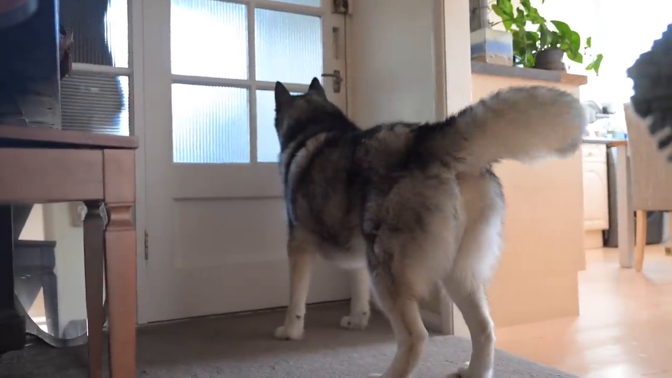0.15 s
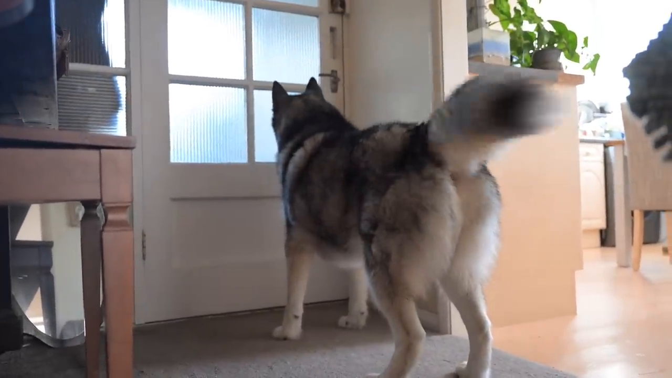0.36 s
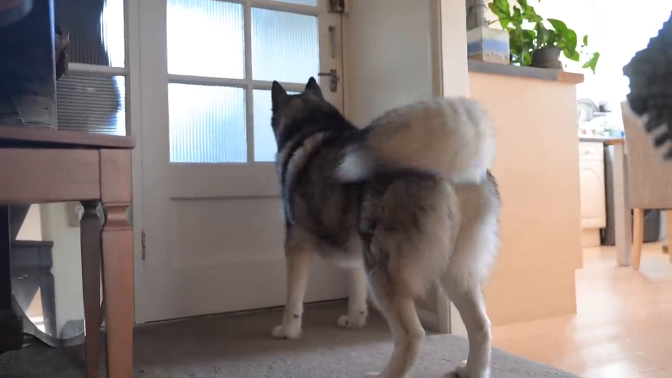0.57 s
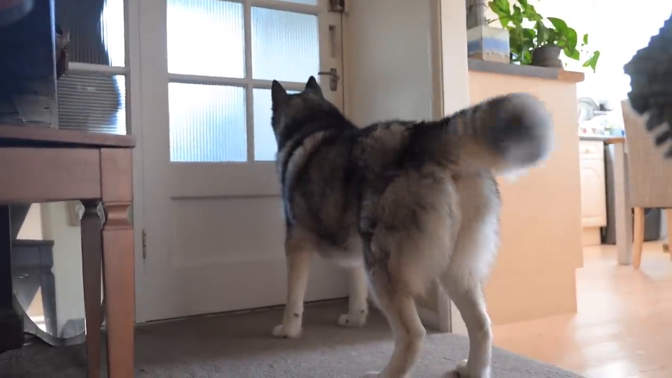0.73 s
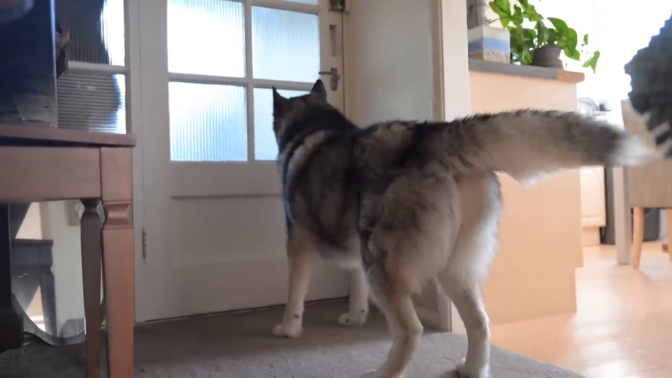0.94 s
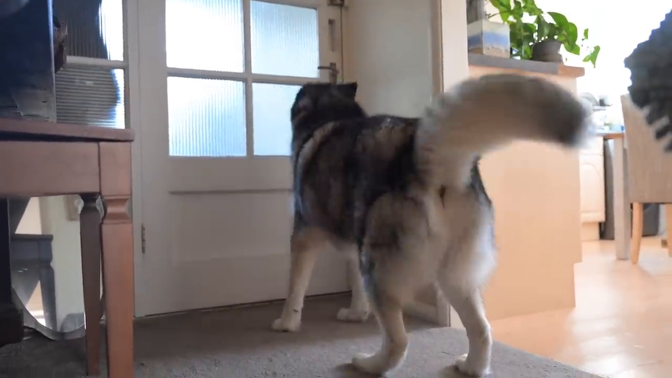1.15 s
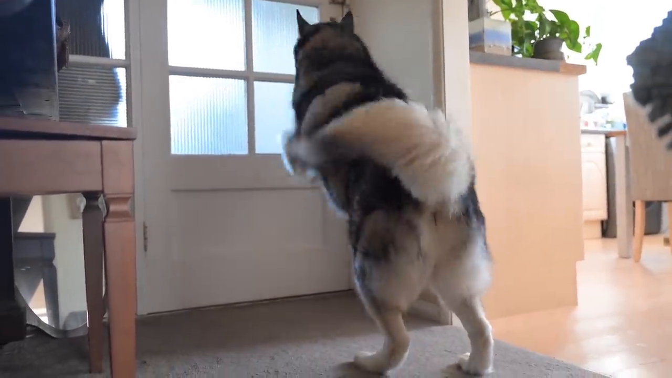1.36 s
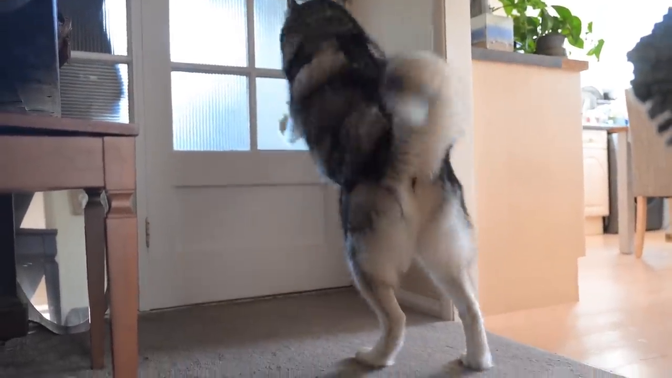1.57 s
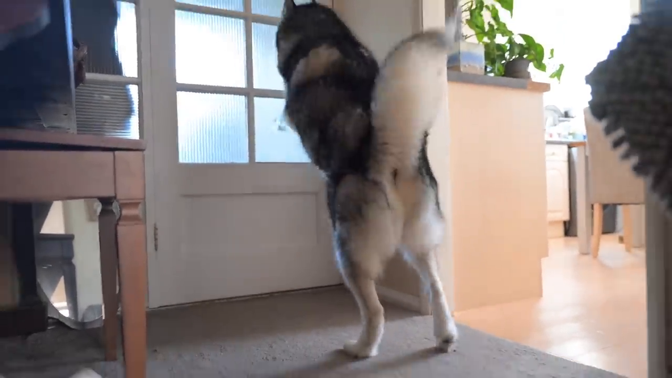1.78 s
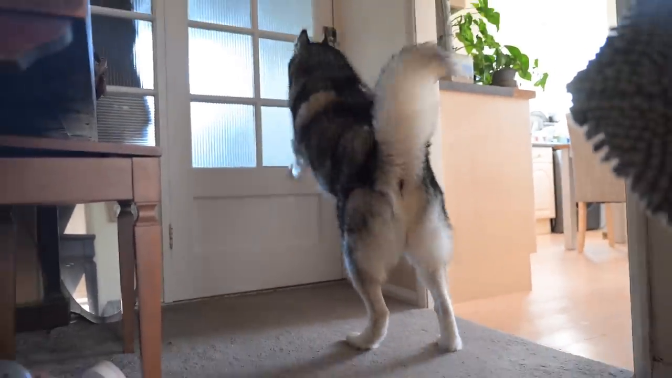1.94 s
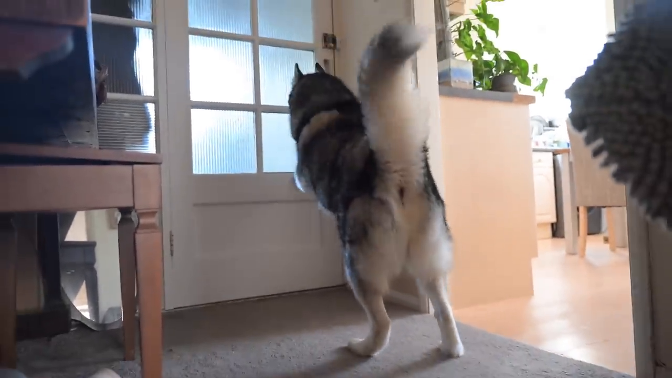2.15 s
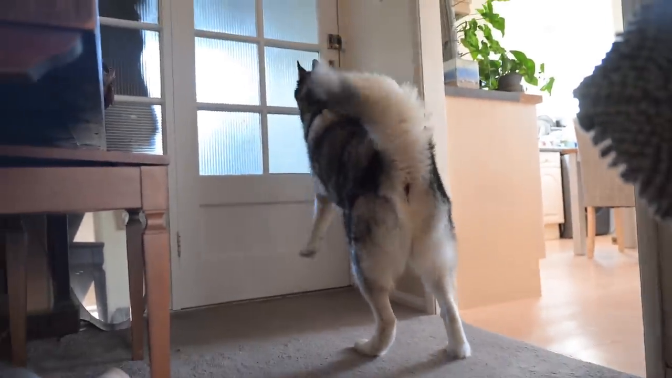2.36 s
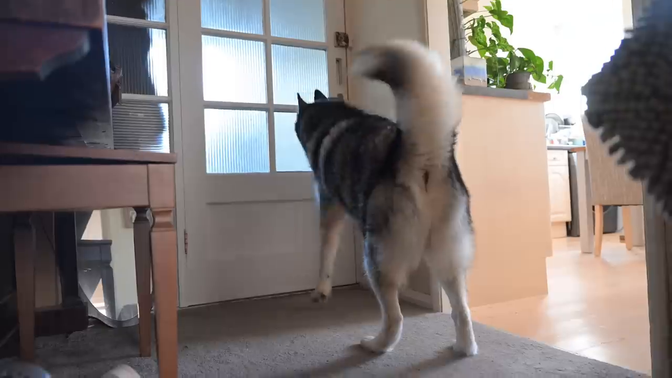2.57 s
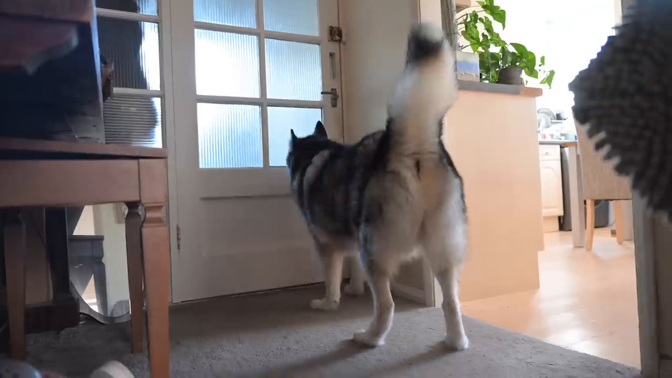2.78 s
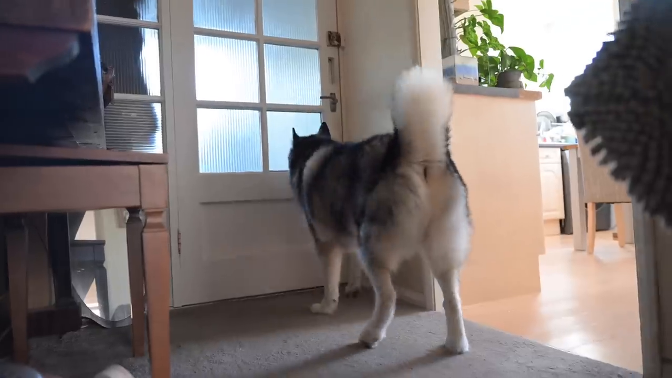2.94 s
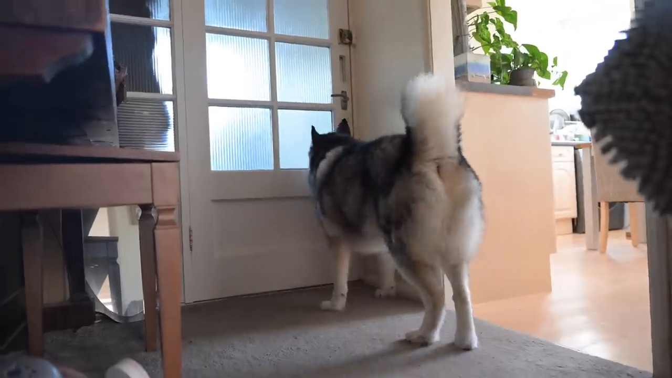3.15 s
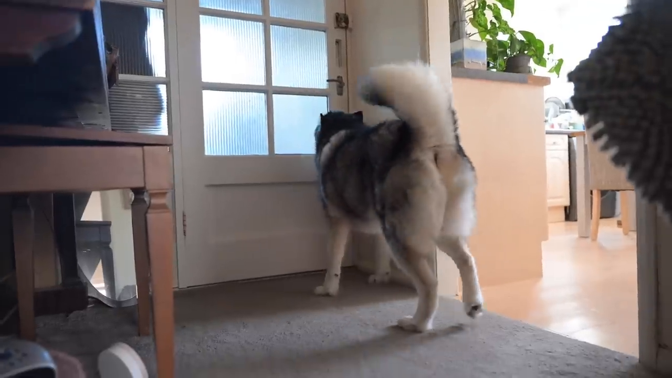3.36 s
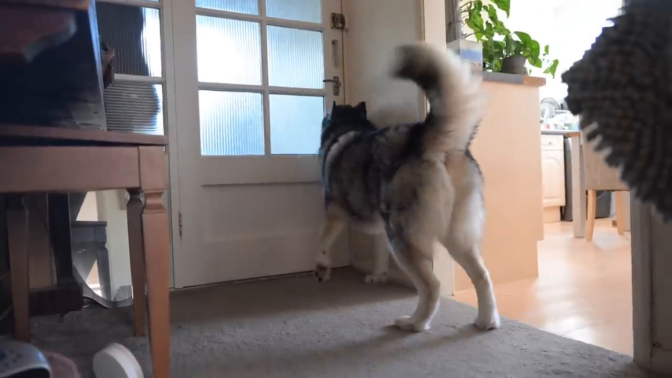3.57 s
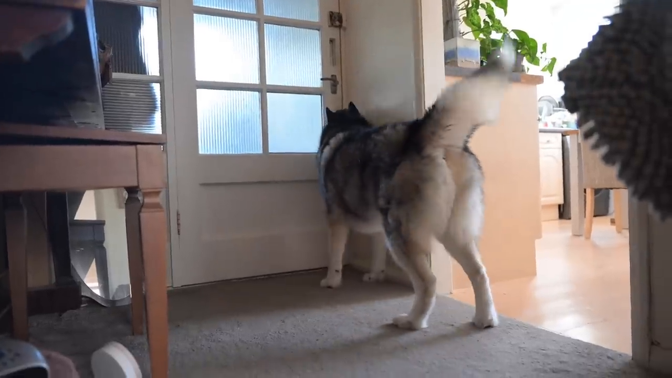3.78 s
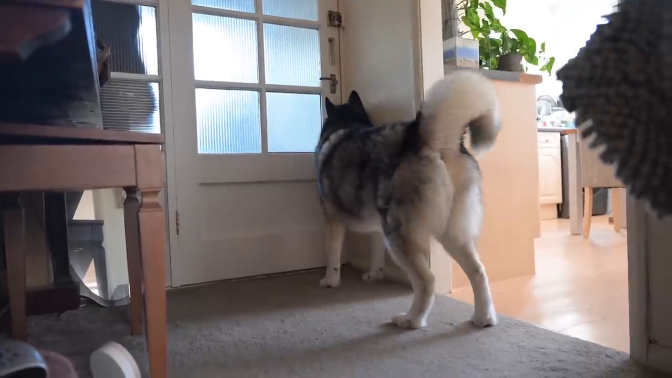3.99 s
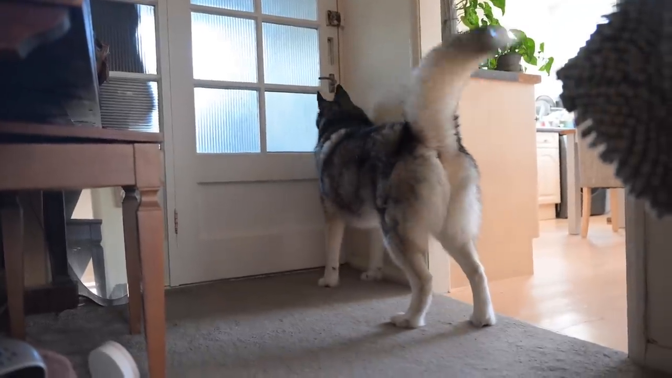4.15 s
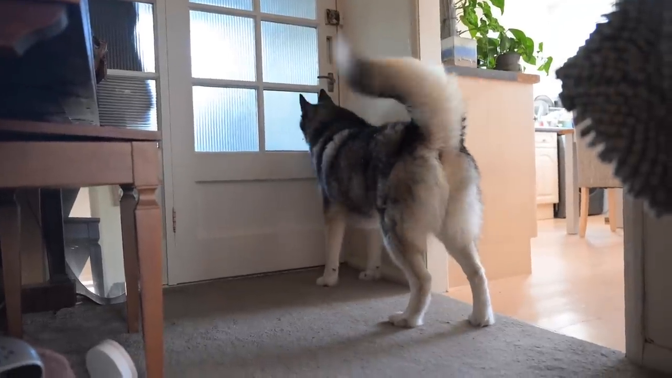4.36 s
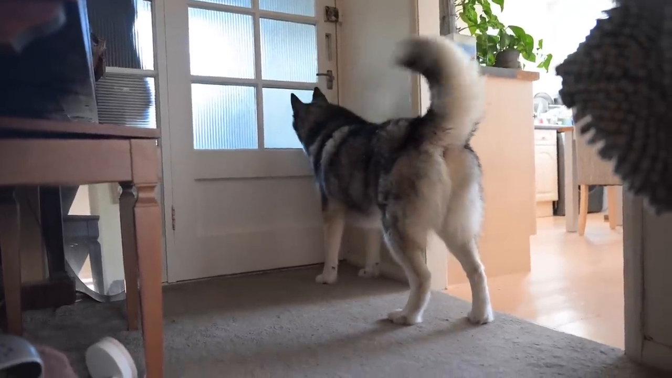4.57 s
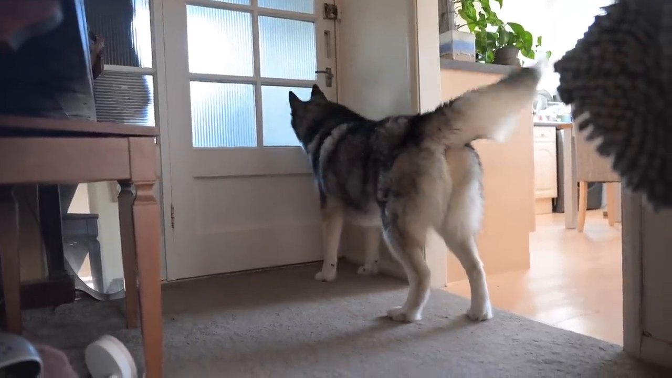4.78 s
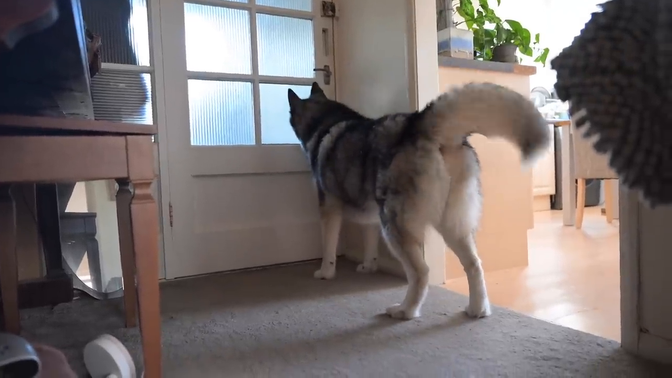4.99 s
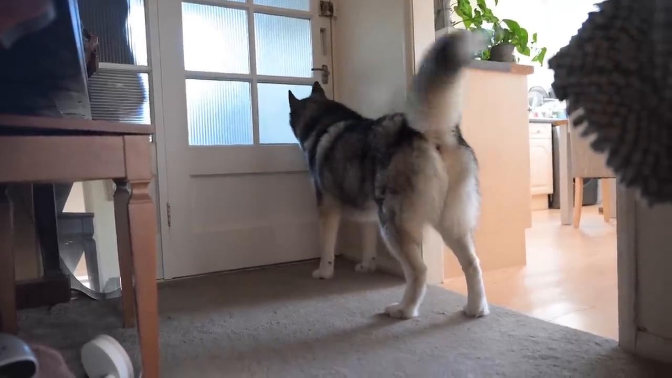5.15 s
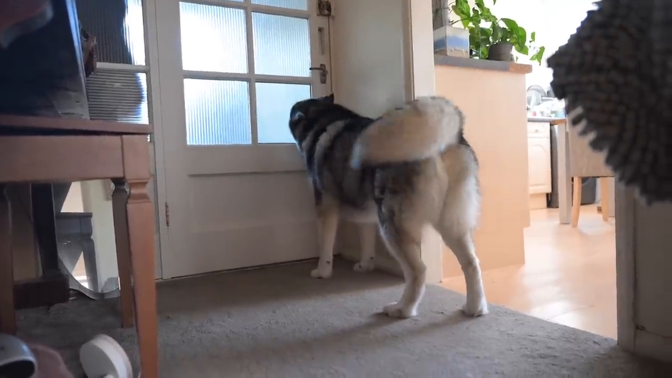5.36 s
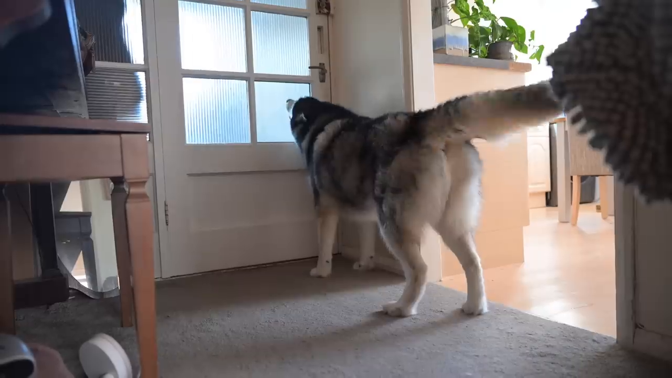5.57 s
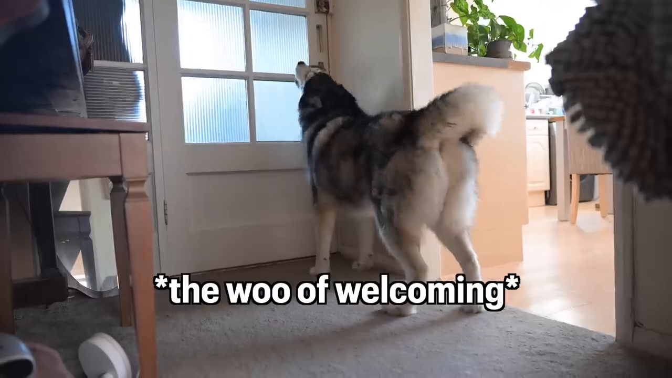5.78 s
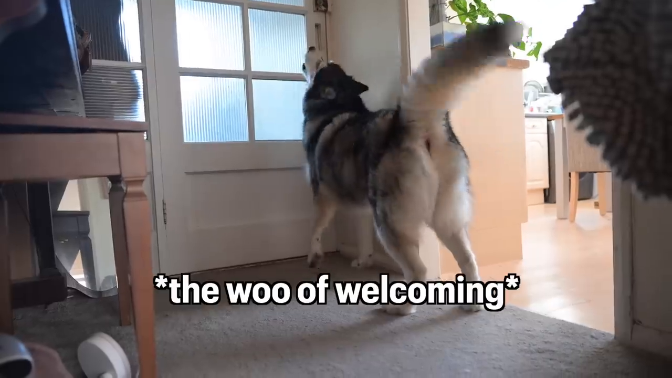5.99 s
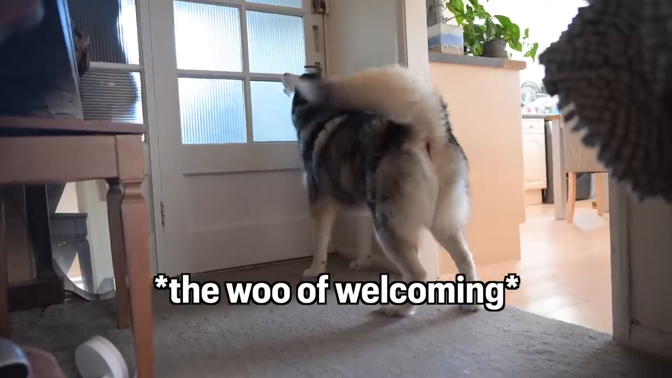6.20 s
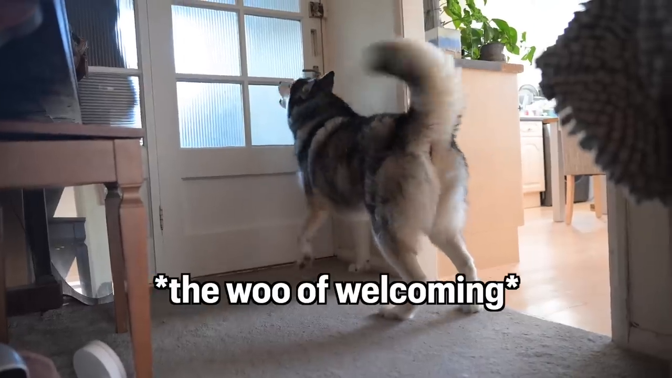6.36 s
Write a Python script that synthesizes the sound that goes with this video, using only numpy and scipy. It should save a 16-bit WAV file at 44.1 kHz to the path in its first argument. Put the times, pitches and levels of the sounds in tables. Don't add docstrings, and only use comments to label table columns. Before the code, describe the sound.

Low, quiet room hum continues for the first second. Around 1.0 s come faint breaths and a small falling nose chirp, then a sharp whine near 4.6 kHz at 1.2 s, dropping a step, and a quick huff. From 1.5 to 2.3 s the large dog scratches a wooden door: gritty claw bursts, bright nail snaps, hollow panel knocks and low rumbles, with a thin squeal over them at 1.6-1.9 s. Another scrape comes at 2.6 s and a heavy paw landing at 2.8 s. Hoarse panting is strongest at 2.75-3.0 s, returns at 3.4-3.7 and 4.1-4.3 s, then nearly stops. Sniffs come around 5.4 s. A squeak at 5.75 s leads into a loud yelp near 950 Hz at 5.83 s, sliding down in wavering steps to a fuller howl near 460 Hz by 6.1 s, sinking to 400 Hz and still sounding at the 6.4 s end.

```python
import sys
import numpy as np
from scipy import signal
from scipy.fft import rfft, irfft, next_fast_len
from scipy.io import wavfile
from scipy.ndimage import uniform_filter1d, minimum_filter1d, map_coordinates

SR = 44100
rng = np.random.default_rng(int(sys.argv[2]) if len(sys.argv) > 2 else 0)


def file_out(sig):
    cols = np.atleast_2d(sig).T
    lim = np.clip(cols, -1, 1)
    pcm = np.round(lim * 32767).astype(np.int16)
    wavfile.write(sys.argv[1], SR, pcm)


def to_linear_factor(level_db):
    exponent = np.asarray(level_db, float) / 20
    return 10 ** exponent


N = 283563


def unit(x):
    return x / np.sqrt(np.mean(x ** 2) + 1e-20)


def along(points, hz):
    f, v = np.transpose(points)
    return np.interp(np.log(hz + 1), np.log(f + 1), v)


def curves(rows):
    s, *cols = np.transpose(rows)
    return [np.interp(np.arange(N) / SR, s, c) for c in cols]


def gate(rows, fade):
    t = np.arange(N) / SR
    inside = np.minimum(t - rows[0][0], rows[-1][0] - t)
    return np.clip(inside / fade + 1, 0, 1) ** 2


def wobble(rate):
    knots = rng.standard_normal(int(N * rate / SR) + 4)
    return map_coordinates(knots, [np.arange(N) * rate / SR])


def filtered(x, response):
    m = next_fast_len(x.shape[-1] + 8192)
    spectrum = rfft(x, m) * response(np.fft.rfftfreq(m, 1 / SR))
    return irfft(spectrum, m)[..., :x.shape[-1]]


def noise(spectrum, size=N):
    return unit(filtered(rng.standard_normal(size), lambda hz: to_linear_factor(along(spectrum, hz))))


def streaky(spectrum, depth_db, extra_db=0):
    z = signal.stft(noise(spectrum), SR, nperseg=512)[2]
    across_pitch = uniform_filter1d(rng.standard_normal(z.shape), 2, 0)
    streaks = uniform_filter1d(across_pitch, 16, 1)
    z = z * to_linear_factor(extra_db + depth_db * unit(streaks))
    z /= np.sqrt(uniform_filter1d(np.sum(abs(z) ** 2, 0), 5))
    return unit(signal.istft(z, SR, nperseg=512)[1][:N])


def swell(t, peak, rise, fall, shape):
    place = (t - peak) / np.where(t < peak, abs(rise), abs(fall))
    return place, np.maximum(-20 * abs(place) ** shape, -150)


def summed(peak, db, rise, fall, shape, *traits):
    column = lambda c: np.reshape(c, (-1, 1))
    t = np.arange(0, N, 64)
    place, env = swell(t / SR, column(peak), column(rise), column(fall), shape)
    power = to_linear_factor(2 * (env + column(db)))
    lead = (power / power.max(0)) ** 3
    blend = lambda c: np.sum(lead * c, 0) / lead.sum(0)
    mixed = [blend(np.clip(place, -1, 1))] + [blend(column(c)) for c in traits]
    return [np.interp(np.arange(N), t, c) for c in (10 * np.log10(power.sum(0)), *mixed)]


# frequency in Hz, level in dB per Hz.
AIR = [(15, -43), (25, -13), (55, -11.5), (91, -9), (113, -11.5), (215, -15), (314, -7.5), (496, -16.5),
       (1420, -24.5), (2010, -27.5), (5590, -32.5), (8600, -40), (15500, -27.5)]
# time in seconds, level in dB.
AIR_DB = [(0.0, -56), (6.43, -57.5)]
# frequency in Hz, likeness from -1 to 1.
ALIKE = [(60, 0.93), (240, 0.79), (950, 0.59), (3770, -0.15), (15000, 0.22)]


def room_tone():
    turn = lambda hz: np.arccos(np.clip(along(ALIKE, hz), -1, 1)) / 2
    pair = rng.standard_normal((2, N))
    mid, side = filtered(pair, lambda hz: to_linear_factor(along(AIR, hz)) * [np.cos(turn(hz)), np.sin(turn(hz))])
    level_db = curves(AIR_DB)[0] + 0.7 * wobble(7.7)
    return to_linear_factor(level_db) * unit(np.array([mid + side, mid - side]))


# frequency in Hz, seconds to fall by 60 dB.
ROOM = [(200, 0.46), (800, 0.3), (2000, 0.26), (4000, 0.23), (12000, 0.087)]


def room(x):
    _, t, z = (hz_t_z := signal.stft(rng.standard_normal((2, SR // 2)), SR, nperseg=256))
    decay = to_linear_factor(-60 * t / along(ROOM, hz_t_z[0])[:, None])
    mid, side = signal.istft(z * decay, SR, nperseg=256)[1]
    side_db = [(100, -10), (300, -12), (600, -10.5), (2000, 1.0), (8000, 3.5)]  # (Hz, dB)
    side = filtered(side, lambda f: to_linear_factor(along(side_db, f)))
    tail = np.array([mid + side, mid - side]) / np.linalg.norm(mid)
    late = np.pad(x, ((0, 0), (200, 0)))
    return signal.fftconvolve(late[:, None], tail[None], axes=2)[..., :N]


# peak in seconds, floor sway in dB, door rumble in dB, fall in seconds.
WEIGHT = [(1.16, -29.5, -40, 0.094), (1.49, -43, -33.5, 0.071), (1.56, -21, -18, 0.18),
          (1.68, -20.5, -25.5, 0.14), (1.8, -22.5, -20.5, 0.22), (1.995, -22, -19.5, 0.14),
          (2.07, -25, -26.5, .15), (2.14, -25, -23, 0.2), (2.295, -27, -18.5, 0.13), (2.54, -31, -36, 0.11),
          (2.61, -36, -29, 0.091), (2.675, -40, -29, 0.04), (2.8, -47.5, -21, 0.19),
          (3.13, -50, -42.5, 0.3), (3.45, -55, -50, 0.67), (3.76, -40.5, -38, 0.18),
          (3.93, -36.5, -61, 0.18), (4.14, -60, -45, 0.12), (4.27, -64.5, -39.5, 0.16),
          (5.33, -61.5, -49, 0.19), (5.53, -38.5, -42, 0.21), (6.15, -49.5, -39, 0.13)]
# frequency in Hz, level in dB per Hz.
DOOR = [(29, -20.5), (40, -4.5), (62, 3), (107, -1.5), (151, -0.5), (220, -3.5), (283, -4), (350, -17.5),
        (460, -39), (770, -120)]


def weight_shifts():
    s, sway_db, rumble_db, fall = np.transpose(WEIGHT)
    sway_db = summed(s, sway_db, np.full(len(s), 0.087), fall, 1.07)[0]
    rumble_db = summed(s, rumble_db, np.full(len(s), 0.05), fall, 1.07)[0]
    sway_hz = 28 * (1 + 0.06 * wobble(8))
    sway = np.sqrt(2) * np.sin(2 * np.pi * np.cumsum(sway_hz) / SR)
    return to_linear_factor(sway_db) * sway + to_linear_factor(rumble_db - 2.0) * noise(DOOR)


# start in seconds, peak in dB, pitch in Hz, seconds to fall by 60 dB.
THUDS = [(1.12, -27.5, 83.5, 0.18), (1.485, -22.5, 231, 0.15), (1.541, -30, 102, 0.18),
         (1.548, -11, 210, 0.15), (1.795, -18.5, 85, 0.12), (1.832, -17.5, 240, 0.17),
         (1.85, -25, 418, 0.065), (1.991, -14, 235, 0.21), (2.0, -19.5, 479, 0.17), (2.15, -18, 131, 0.18),
         (2.305, -26, 530, 0.13), (2.31, -25, 400, 0.13), (2.615, -26, 249, 0.11),
         (2.111, -18.5, 103, 0.46), (2.283, -20.5, 168.2, 0.31), (2.526, -24, 91, 0.11),
         (2.599, -25, 103, 0.13), (2.675, -17.5, 104.5, 0.17), (2.802, -7.5, 117, 0.17),
         (3.122, -36, 118, 0.1), (3.208, -33.5, 77.6, 0.14), (3.749, -33, 110, 0.2),
         (4.126, -36, 243, 0.061), (4.274, -41, 83.4, 0.12), (5.53, -33, 60.9, 0.16),
         (6.125, -61, 317, 0.14)]


def thuds():
    t = np.arange(SR // 2) / SR
    out = np.zeros(N + SR)
    for s, db, hz, t60 in THUDS:
        attack = 1 - np.exp(-t / 0.00058)
        out[round(s * SR):][:len(t)] += to_linear_factor(db - 60 * t / t60) * attack * np.sin(2 * np.pi * hz * t)
    return out[:N]


# start in seconds, peak in dB, left minus right in dB, pitch in Hz.
TICKS = [
    (1.9184, -36.5, 4.5, 7000),
    (2.4675, -23, -1, 14000),
    (2.4987, -26, -8, 3800),
    (2.9885, -39.5, -2.5, 8500),
    (3.0627, -44, -6.5, 7000),
    (3.0786, -49.5, 9.5, 7000),
    (4.583, -61.5, -1, 7000),
    (4.9034, -49, -16.5, 6500),
]
# start in seconds, peak in dB, pitch in Hz.
SNAPS = [(1.474, -16, 6000), (1.544, -11.5, 6000), (1.55, -17, 5300), (1.808, -19, 6000),
         (1.9855, -10, 4000), (1.991, -18, 3510), (2.0845, -26, 9000), (2.159, -19, 7000),
         (2.1642, -13, 4500), (2.2802, -17, 9000), (2.2864, -14, 6000), (2.2909, -12, 10500),
         (2.2965, -14, 11500), (2.589, -32, 11000), (2.5985, -26.5, 8000), (2.6192, -11.5, 8000),
         (2.6255, -14, 6500), (4.2745, -24, 2000)]


def ticks():
    t = np.arange(SR // 50) / SR
    out = np.zeros((2, N))
    for s, db, pan_db, hz in TICKS + [(s, db, 0, hz) for s, db, hz in SNAPS]:
        colour = [(hz / 6, -30), (hz / 2, -9), (hz, 0), (hz * 1.6, -6), (hz * 4, -30)]  # (Hz, dB)
        click = noise(colour, len(t)) * to_linear_factor(db - 1.5 - 60 * t / 0.007)
        out[:, round(s * SR):][:, :len(t)] += click * to_linear_factor([[pan_db / 2], [-pan_db / 2]])
    return out


# frequency in Hz, width in Hz, level in dB.
PANEL = [(400.7, 47, -4), (751, 120, -2.5), (1110, 93, -3.5), (1700, 34, -10), (1990, 82, -10),
         (2064, 26, -4.5), (3200, 68, -17)]


def panel(hz):
    total = 0
    for k, (centre, width, db) in enumerate(PANEL):
        damping = 1j * hz * width
        total = total + (-1) ** k * to_linear_factor(db) * damping / (centre * centre - hz * hz + damping)
    return total


# start in seconds, peak in dB, knock in dB, sheen in dB, seconds to fall by 60 dB.
CLAWS = [(1.473, -3, -23.5, -30.5, 0.13), (1.5436, -6.5, -18, -17.5, 0.13), (1.6688, -17, -4.5, -44, 0.065),
         (1.8043, -6.5, -20, -17.5, 0.074), (1.829, -8.5, -5.5, -32, 0.088),
         (1.9843, -4, -6.5, -27.5, 0.077), (2.083, -22, -16, -4.5, 0.13), (2.1256, -20.5, -10.5, -17, 0.11),
         (2.1591, -3.5, -25, -29, 0.082), (2.28, -9.5, -19.5, -2, 0.2), (2.298, -7.5, -12, -7, 0.048),
         (2.3155, -21.5, -13, -4.5, 0.078), (2.597, -19, -22.5, -14, 0.3), (2.619, -12.5, -24.5, -5, 0.12)]
# frequency in Hz, level in dB per Hz.
SCRATCH = [(710, -24), (1200, -19), (1320, -7), (2180, -2), (2460, -3), (3620, -3.5), (9000, -19),
           (11700, -50), (19800, -120)]


def claws():
    t = np.arange(SR // 3) / SR
    out = np.zeros(N + SR)
    sheen_colour = [(8000, -51.5), (9000, -4.5), (13000, 8.5), (16000, -17)]  # (Hz, dB per Hz)
    for s, db, knock_db, sheen_db, t60 in CLAWS:
        rise_s = 0.00077 * to_linear_factor(-0.36 * db)
        grains_db = 2.0 * rng.exponential(size=len(t))
        grit = to_linear_factor(grains_db - 60 * t / t60) * (1 - np.exp(-t / rise_s))
        sheen = noise(sheen_colour, len(t)) * to_linear_factor(-60 * t / 0.56)
        knock = unit(filtered(rng.standard_normal(len(t)), panel))
        knock = knock * to_linear_factor(-60 * t / (2.07 * t60)) * (1 - np.exp(-t / 0.0032))
        burst = grit * (noise(SCRATCH, len(t)) + to_linear_factor(sheen_db + 9.0) * sheen) + to_linear_factor(knock_db + 13.0) * knock
        out[round(s * SR):][:len(t)] += to_linear_factor(db - 12.0) * burst
    return out[:N]


# time in seconds, pressure in dB.
DRAG = [(1.46, -42), (1.67, -38.5), (1.842, -30), (2.028, -39), (2.218, -35), (2.276, -31.5), (2.44, -38.5),
        (2.5, -48.5), (2.582, -49), (2.605, -31.5), (2.63, -33), (2.67, -56), (2.72, -62)]


def fur_drag():
    scrape_db, = curves(DRAG)
    hiss_db = -51 + 0.18 * (scrape_db - scrape_db.max())
    drag = to_linear_factor(scrape_db) * streaky(MOUTH, depth_db=4.0) + to_linear_factor(hiss_db + 6.0) * streaky(HISS, depth_db=4)
    return gate(DRAG, 0.033) * to_linear_factor(3.0 * wobble(50)) * drag


# frequency in Hz, level in dB per Hz.
MOUTH = [(200, -57), (400, -15.5), (650, -13.5), (1100, -10), (1500, -12), (2600, -14.5), (3600, -23.5),
         (4200, -29.5), (5500, -52.5), (9000, -88)]


def turbulence(peak_hz, tilt_db, width, lift_db, second_db):
    hz, t, _ = signal.stft(peak_hz, SR, nperseg=512)
    hz = hz[:, None]
    centre, tilt_db, lift_db = (np.interp(t, np.arange(N) / SR, c) for c in (peak_hz, tilt_db, lift_db))
    bump = lambda ratio: np.exp(-(np.log((hz + 1) / (ratio * centre)) / width) ** 2)
    slope = tilt_db * np.log2(np.clip(hz, 300, 5000) / 1200)
    return streaky(MOUTH, depth_db=4, extra_db=lift_db * bump(0.97) + second_db * bump(2.5) + slope)


# peak in seconds, level in dB, rise in seconds, fall in seconds, mouth resonance in Hz.
BREATHS = [(0.99, -50, 0.056, .06, 1300), (1.045, -45.5, 0.05, 0.05, 1920), (1.2, -46, 0.062, 0.2, 1560),
           (1.32, -37, 0.097, 0.012, 1200), (1.391, -31, 0.035, 0.063, 1240),
           (2.745, -27, 0.0096, 0.076, 1590), (2.785, -21, 0.046, 0.087, 1740),
           (2.86, -24.5, 0.14, 0.098, 1116), (2.92, -21.5, 0.12, 0.069, 1230),
           (2.97, -27, 0.033, 0.039, 1300), (3.03, -49, 0.059, 0.055, 1300), (3.15, -41.5, 0.13, 0.19, 706),
           (3.26, -43.5, 0.12, 0.032, 1090), (3.295, -40, 0.036, 0.055, 1700),
           (3.431, -34, 0.12, 0.17, 1590), (3.53, -38, 0.29, 0.084, 1030),
           (3.654, -26.5, 0.071, 0.079, 1565), (3.723, -24.5, 0.073, 0.035, 817),
           (3.92, -47.5, 0.36, 0.27, 1075), (4.114, -32.5, 0.015, 0.13, 1700),
           (4.21, -32, 0.059, 0.095, 970), (4.293, -30, 0.033, 0.12, 1294), (4.46, -55.5, .05, 0.33, 1200),
           (4.95, -48.5, 0.055, 0.15, 1100), (5.33, -34.5, 0.06, 0.063, 1045),
           (5.79, -37, 0.078, 0.057, 2240)]
# peak in seconds, level in dB, rise in seconds, fall in seconds, nose resonance in Hz.
SNIFFS = [
    (5.219, -48.5, 0.24, 0.083, 3210),
    (5.415, -33.5, .02, 0.069, 3300),
    (5.46, -29.5, 0.063, 0.098, 3180),
    (5.712, -51, 0.14, .05, 2990),
]
# peak in seconds, level
# in dB, rise in seconds, fall in seconds.
NOSTRILS = [
    (1.01, -57, .05, .08),
    (1.201, -44, 0.12, 0.17),
    (1.67, -47.5, 0.36, 0.14),
    (3.31, -46, 0.029, 0.52),
    (4.18, -49, .06, 0.14),
    (5.261, -51, 0.24, 0.14),
    (5.66, -50, 0.12, 0.25),
    (5.83, -54.5, 0.16, .03),
]
# frequency in Hz, level in dB per Hz.
HISS = [(2600, -8.5), (4000, -5), (5000, -7), (7000, -12.5), (9000, -12), (10500, -12.5), (12500, -8),
        (14000, -9), (16000, -23.5)]


def breaths():
    s, db, rise, fall, hz = np.transpose(BREATHS + SNIFFS)
    through_nose = hz > 2200
    db, place, peak_hz, nasal = summed(s, db, rise, fall, 1.77, hz, through_nose)
    tilt_db = -2 - 3 * place + 4.5 * nasal
    teeth_db = np.minimum(db - 24, -46)
    nostril_db = summed(*np.transpose(NOSTRILS), 1.6)[0]
    hiss = np.hypot(to_linear_factor(teeth_db), to_linear_factor(nostril_db))
    rasp = 1.5 * wobble(110) + 1.0 * wobble(25)
    lift_db = 6.5 + 0.23 * np.clip(db + 41.5, -10, 30) + 2 * nasal
    mouth = turbulence(peak_hz, tilt_db, width=0.1, lift_db=lift_db, second_db=0.0)
    return to_linear_factor(db + rasp) * mouth + hiss * to_linear_factor(8.0 + 0.27 * rasp) * streaky(HISS, depth_db=4.5)


# peak in seconds, level in dB, length in seconds, pitch in Hz, glide in Hz per second.
HOARSE = [(1.205, -42, 0.087, 5100, 1500), (1.419, -44, .035, 3850, 0), (1.298, -38, 0.055, 1250, -2),
          (2.8, -27.5, 0.12, 1120, -1000), (2.865, -23.5, 0.063, 1110, 0), (2.908, -19, 0.062, 1105, 0),
          (2.956, -23.5, .09, 1290, 600), (3.032, -41, .1, 1310, 0), (3.01, -34.5, .06, 430, -300),
          (3.35, -46, .12, 4950, 0), (3.301, -41, 0.046, 3850, 0), (3.44, -38.5, 0.17, 1510, -300),
          (3.545, -35.5, 0.089, 1080, 0), (3.665, -31, 0.11, 1586, 0), (3.72, -29, .1, 880, -1500),
          (4.291, -31, 0.069, 1230, -3), (5.24, -48, .24, 3250, 499), (5.26, -54, 0.22, 6000, -600),
          (5.18, -51, 0.12, 6300, 0), (5.236, -50, 0.099, 6840, 0), (5.281, -47, 0.089, 8900, 2),
          (5.66, -57, 0.16, 4750, 498), (5.79, -46, .12, 2910, 4.5), (2.91, -29.5, .12, 2000, 1),
          (2.9, -32.5, .14, 2450, 500), (2.76, -35, 0.0606, 1400, 0), (2.98, -31.5, .06, 710, 0),
          (1.63, -40, .1, 5370, 0), (5.8, -40, .1, 1950, -2), (1.22, -43, 0.093, 1550, 0),
          (1.06, -48.5, 0.0496, 1900, 0), (3, -55, .08, 8260, 3000), (4.17, -38.5, .16, 1780, 801),
          (4.32, -39.5, .12, 2150, 0), (4.35, -40.5, .14, 450, 0), (4.225, -41, .06, 480, 0),
          (4.36, -41, .13, 1450, 500)]


def hoarse():
    t, out = np.arange(N) / SR, np.zeros(N)
    for s, db, length, hz, glide in HOARSE:
        i = slice(round((s - length) * SR), round((s + length) * SR))
        env = swell(t[i], s, length / 2, length / 2, 1.5)[1]
        knots = rng.standard_normal((2, 256))
        wander = (t[i] - t[i][0]) * 0.06 * hz
        a, b = (map_coordinates(k, [wander]) for k in knots)
        phase = 2 * np.pi * np.cumsum(hz + glide * (t[i] - s)) / SR
        out[i] += to_linear_factor(db + env) * (a * np.cos(phase) + b * np.sin(phase))
    return out


# peak in seconds, level in dB, length in seconds, pitch in Hz, glide in Hz per second.
CHIRPS = [
    (1.042, -35.5, 0.043, 4590, -7000),
    (1.104, -43, 0.039, 4770, -1500),
    (1.25, -21, .035, 4620, -0.5),
    (5.088, -43, 0.096, 4480, 3502),
]
# peak in seconds, level in dB, length in seconds, pitch in Hz, glide in Hz per second.
SWELLS = [
    (2.868, -35, .15, 3995, -600),
]
# peak in seconds, level in dB, length in seconds, pitch in Hz, glide in Hz per second.
BREATHY = [(1.2, -45.5, .09, 4880, 285), (2.165, -43.5, 0.11, 4060, 1502), (3.33, -51, 0.065, 4290, 5002),
           (3.385, -46.5, 0.13, 4060, -2500), (3.46, -47.5, 0.11, 4006, 596), (3.53, -53, .1, 4080, -500),
           (3.58, -47, .08, 3890, -10), (3.66, -45, 0.13, 4070, -300), (3.72, -67, .06, 3970, -1000),
           (5.11, -63, .12, 4570, 4001), (5.19, -56, 0.098, 4320, 2996), (5.56, -60, 0.037, 4380, 0),
           (5.6, -52.5, .06, 4510, 1498)]
# time in seconds, pitch in Hz, level in dB.
WHINE = [(1.203, 4650, -44.5), (1.222, 4640, -18), (1.232, 4620, -29.5), (1.243, 4570, -24.5),
         (1.256, 4250, -24), (1.267, 4063, -17.5), (1.276, 3930, -30), (1.29, 3920, -35), (1.31, 3950, -55)]
# time in seconds, pitch in Hz, level in dB.
SQUEAL = [(1.6, 4290, -45), (1.612, 4235, -26), (1.64, 4142, -22.5), (1.664, 4130, -16.5),
          (1.698, 4153, -15.5), (1.715, 4175, -26), (1.728, 4200, -36)]
# time in seconds, pitch in Hz, level in dB.
SQUEAL_AGAIN = [(1.74, 4180, -27.5), (1.758, 4160, -14.5), (1.768, 4140, -25), (1.792, 4060, -25.5),
                (1.82, 4090, -21.5), (1.852, 4108, -23), (1.908, 4058, -28.5), (1.92, 4060, -43.5),
                (1.97, 4100, -48.5)]
# time in seconds, pitch in Hz, level in dB.
SQUEAK = [(5.742, 4320, -44.5), (5.762, 4280, -26), (5.794, 4302, -30), (5.816, 4270, -20),
          (5.836, 4268, -22.5), (5.846, 4236, -40)]


def whistles():
    t, notes = np.arange(N) / SR, []
    drift, flutter_db, blur = 0.0044 * wobble(150), 3.17 * wobble(110), 1.2 * wobble(420)
    # rows, share of length spent rising, swell shape, octave over the tone in dB, looseness
    short = [(CHIRPS, 0.2, 2.2, -28, 1), (SWELLS, 0.7, 3.5, -24, 1), (BREATHY, 0.45, 2.6, 4, 1.25)]
    for rows, rise_share, shape, octave_db, loose in short:
        for s, db, length, hz, glide in rows:
            i = slice(round((s - 2 * length) * SR), round((s + 2 * length) * SR))
            env = swell(t[i], s, rise_share * length, (1 - rise_share) * length, shape)[1]
            gain = to_linear_factor(db + env)
            notes.append((i, hz + glide * (t[i] - s), gain, gain * to_linear_factor(octave_db), loose))
    # rows, octave in dB, looseness
    held = [(WHINE, -44, 1), (SQUEAL, -43, 0.4), (SQUEAL_AGAIN, -43, 0.6), (SQUEAK, -36, 0.4)]
    for rows, octave_db, loose in held:
        i = slice(round((rows[0][0] - 0.01) * SR), round((rows[-1][0] + 0.01) * SR))
        hz, db, on = (c[i] for c in (*curves(rows), gate(rows, 0.008)))
        octave = on * to_linear_factor(octave_db + 0.3 * (db - db.max()))
        notes.append((i, hz, on * to_linear_factor(db), octave, loose))
    out = np.zeros(N)
    for i, hz, gain, octave, loose in notes:
        unsteady = min(loose, 1)
        phase = 2 * np.pi * np.cumsum(hz * (1 + unsteady * drift[i])) / SR
        tone = np.sin(phase + 0.2 * loose ** 3 * blur[i])
        twelfth = np.sin(3 * phase + blur[i])
        upper = np.sin(2 * phase + 0.16 * blur[i]) + to_linear_factor(-16.0) * twelfth
        out[i] += to_linear_factor(unsteady * flutter_db[i]) * (gain * tone + octave * upper)
    return np.sqrt(2) * out


# time in seconds, pitch in Hz, level in dB.
YELP = [(5.77, 1025, -30), (5.822, 1040, -32.5), (5.832, 1110, -10), (5.846, 965, -1.5), (5.856, 952, -2.5),
        (5.866, 951, -8.5), (5.886, 945, -4), (5.926, 930, -2.5), (5.95, 845, -0.5)]
# time in seconds, pitch in Hz, level in dB.
SLIDE = [(5.966, 796.5, -4.5), (5.975, 774.6, -21), (5.983, 763.7, -10.5), (6.0, 720.3, -19),
         (6.042, 681.6, -6.5), (6.06, 655.2, -16.5), (6.076, 575.7, -7), (6.086, 510, -26),
         (6.094, 530, -10.5)]
# time in seconds, pitch in Hz, level in dB.
WOO = [(6.102, 475.7, -16.5), (6.178, 461.3, -7.5), (6.2, 452, -4.5), (6.236, 433.7, -7.5),
       (6.266, 426, -24), (6.298, 417, -7), (6.309, 408.8, -17), (6.324, 410.6, -5.5), (6.43, 399, -4.5)]
# pitch of the voice in Hz, octave over the tone in dB.
CHEST = [(400, -7.5), (430, -13), (460, -15), (500, 3.5), (650, -31), (945, -25.5), (1020, -46.5)]
# time in seconds, level in dB.
OPENING = [(5.83, -53), (5.9, -55), (5.93, -48), (5.98, -52), (6.05, -58), (6.12, -53.5), (6.19, -46.5),
           (6.26, -52.5), (6.37, -44.5)]
# frequency in Hz, level in dB.
THROAT = [(1200, 6.5), (1700, 8), (2260, -0.5), (3320, -1), (4000, -13.5), (4510, -24), (5410, -9),
          (6500, -26), (9000, -38.5)]
# frequency in Hz, level in dB per Hz.
RASP = [(480, -45.5), (620, 4.5), (1100, 8.5), (2000, -4), (3400, -6), (4400, -18), (5500, -9.5),
        (6500, -23.5), (9000, -60)]
# frequency in Hz, level in dB.
TEETH = [(4500, -30), (5500, 0), (6500, -7), (8800, -5), (10000, -12), (12500, 2), (16000, -8)]


def howl():
    rows = YELP + SLIDE + WOO
    hz, db = curves(rows)
    db = uniform_filter1d(db, SR // 150)
    open_db, = curves(OPENING)
    phase = 2 * np.pi * np.cumsum(hz * (1 + 0.002 * wobble(60))) / SR
    loose = 0.085 * wobble(120)
    speed = uniform_filter1d(abs(np.gradient(np.log(hz))) * SR, SR // 25)
    slide = np.clip(speed / 5, 0, 1)
    shaky = to_linear_factor(2.5 * slide * np.clip((915 - hz) / 100, 0, 1) * wobble(130))
    octave_db = db + along(CHEST, hz) - 2 + 1.5 * wobble(25)
    octave = to_linear_factor(octave_db) * np.sin(2 * phase + 1.5 * loose)
    upper = np.zeros(N)
    for k in range(3, 20):
        overtone_db = along(THROAT, k * hz) + 5.5 * wobble(13)
        upper += to_linear_factor(overtone_db) * np.sin(k * (phase + loose) + k * k)
    air = (1 + 0.18 * np.cos(phase)) * to_linear_factor(6) * streaky(RASP, depth_db=4)
    teeth_db = -48 + 1.3 * (open_db - open_db.max())
    hiss = to_linear_factor(teeth_db) * streaky(TEETH, depth_db=2.5)
    tone = shaky * (to_linear_factor(db) * np.sin(phase) + octave)
    return np.sqrt(2) * gate(rows, 0.02) * (tone + to_linear_factor(open_db) * (to_linear_factor(-0.5) * upper + air) + hiss)


def scene():
    voice, nose, air = howl(), whistles(), breaths()
    paws = claws() + fur_drag()
    near = to_linear_factor(1.0) * nose + to_linear_factor(-3.5) * air + to_linear_factor(-1.0) * paws
    far = to_linear_factor(-11.5) * air + to_linear_factor(-12.5) * paws + to_linear_factor(-11) * nose
    loud_db = 10 * np.log10(abs(uniform_filter1d(voice ** 2, SR // 50)) + 1e-12)
    duck = to_linear_factor(-11 * np.clip((loud_db + 16) / 8, 0, 1))
    wet_voice, wet_rest = room(np.array([to_linear_factor(-15) * voice, far]))
    body = weight_shifts() + thuds() + ticks()
    return to_linear_factor(-3.5) * voice + wet_voice + duck * (near + wet_rest + body + room_tone() + hoarse())


def low_pass(x):
    return signal.sosfilt(signal.butter(12, 15690, fs=SR, output="sos"), x)


# frequency in Hz, level in dB.
MIC = [(9000, 1), (10600, -4.5), (10850, -17), (11250, -24), (11500, -5.5), (15000, -11), (16400, -20)]
# frequency in Hz, left minus right in dB.
LEFT = [(300, 0), (700, 0.5), (1500, -1), (5000, 2), (9000, 7.5), (13000, -3)]


def record(dry):
    sides = np.array([[0.5], [-0.5]])
    delay = lambda hz: np.exp(2j * np.pi * hz * sides * 1.07 / SR)
    x = filtered(dry, lambda hz: to_linear_factor(along(MIC, hz) + sides * along(LEFT, hz)) * delay(hz))
    power = abs(uniform_filter1d(x ** 2, SR // 300, 1)).max(0)
    swing = np.sqrt(2 * power + 1e-9)
    need = minimum_filter1d(np.minimum(1, 0.8 / swing), SR // 100)
    x = x * uniform_filter1d(need, SR // 100)
    return low_pass(np.clip(x, -1, 1))


dry = scene()
out = record(dry)
file_out(out)
```